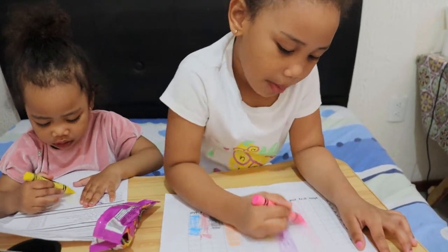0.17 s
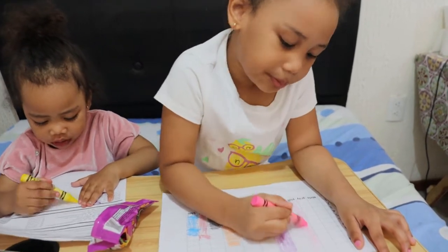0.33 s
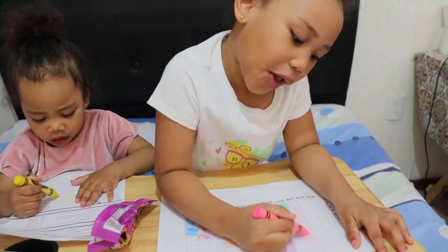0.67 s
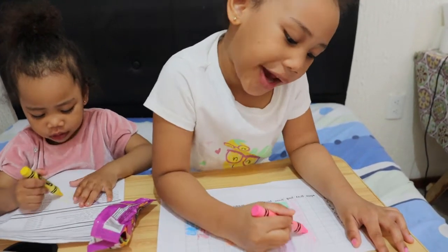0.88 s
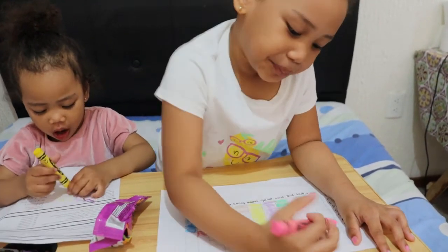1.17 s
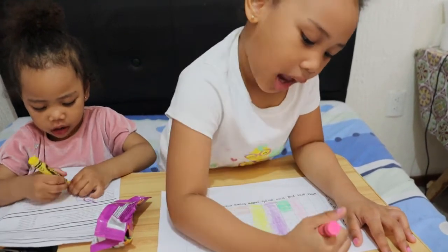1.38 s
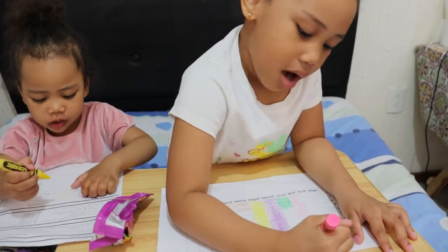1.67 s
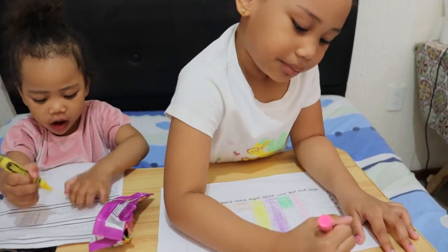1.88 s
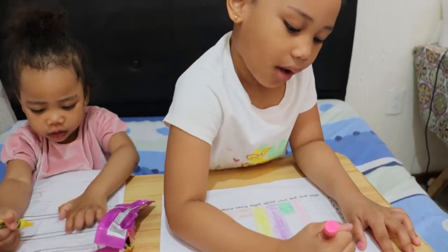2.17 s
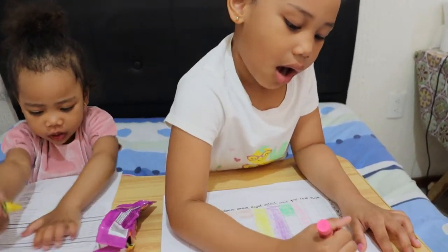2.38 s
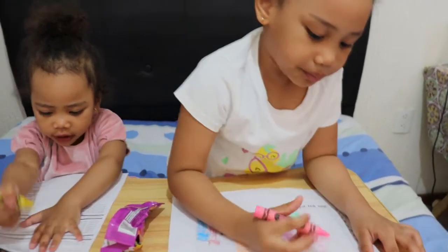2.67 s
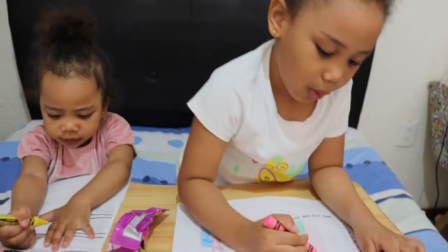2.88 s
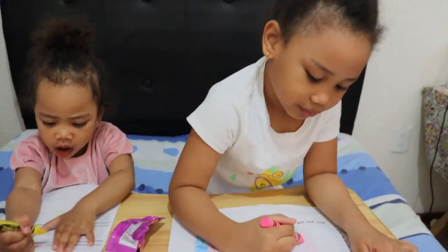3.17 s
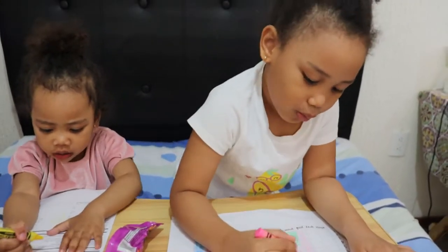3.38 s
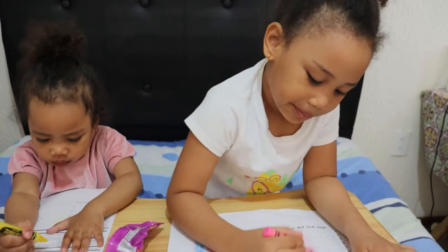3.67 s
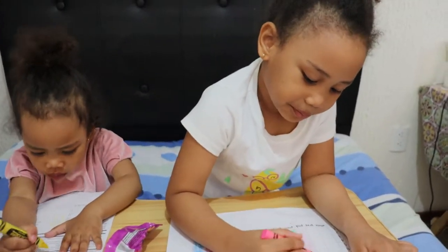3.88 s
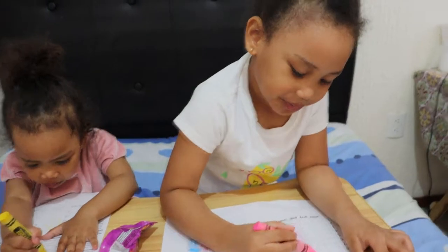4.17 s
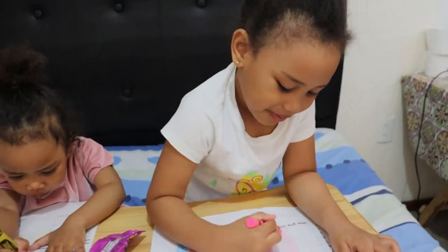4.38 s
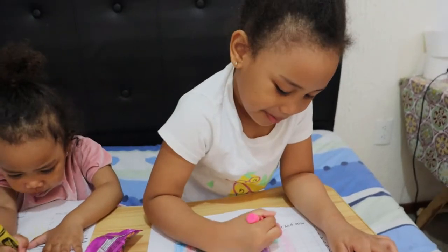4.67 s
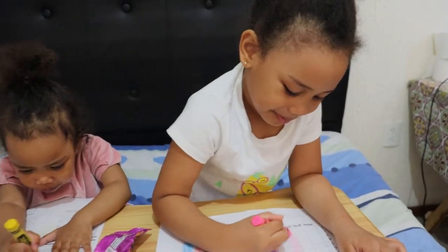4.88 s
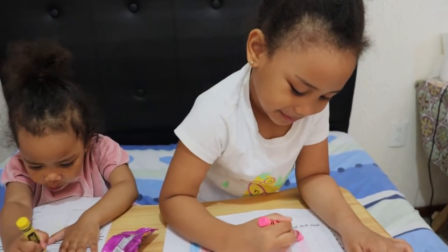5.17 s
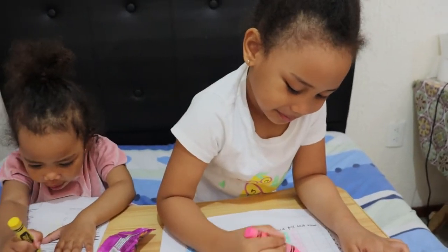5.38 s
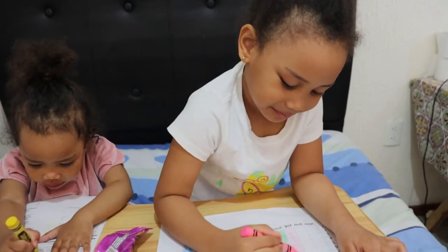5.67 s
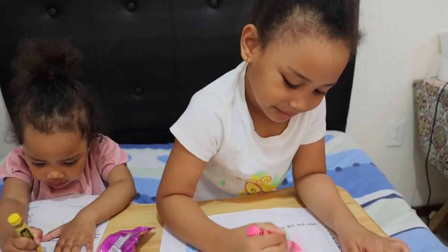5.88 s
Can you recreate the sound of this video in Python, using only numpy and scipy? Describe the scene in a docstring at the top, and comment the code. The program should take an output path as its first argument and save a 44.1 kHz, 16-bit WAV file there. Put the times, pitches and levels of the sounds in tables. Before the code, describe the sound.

Wax crayons scribble on paper over a wooden table, heard up close in a quiet bedroom with faint room tone and little echo. For the first second, quick back-and-forth strokes scratch and hiss, with a few sharp paper snaps around 0.6 seconds. From about 1 to 3 seconds the scribbling stops: hands slide the sheets in short rustling swells, the paper crackles, and soft elbow bumps and light taps sound on the table, mostly a little to the left. Crisp snaps stand out near 2.2 and 2.5 seconds. Around 2.8 seconds comes the loudest moment, a quick cluster of knocks from crayons and knuckles on the wood. From about 3.1 seconds the grainy rubbing resumes, roughly seven strokes a second, slightly right of centre. It continues to the end at 6 seconds, growing a little softer, with single knocks near 4, 4.4 and 5.2 seconds.

```python
"""Crayons on a wooden table

Two wax crayons scribble on paper in a quiet bedroom, heard up close. The wax grinds on the paper
grain, chatters and hisses, and drives the table top. Hands slide sheets about, the paper crackles
and snaps, crayons and knuckles knock on the wood, and elbows bump it softly."""
import sys
import numpy as np
from scipy import signal
from scipy.fft import rfft, irfft, next_fast_len
from scipy.io import wavfile
from scipy.ndimage import uniform_filter1d

SR = 44100
rng = np.random.default_rng(int(sys.argv[2]) if len(sys.argv) > 2 else 0)


def put_to_file(sound):
    """Save the sound as 16-bit audio at rate SR, in the file named by the first command-line argument."""
    columns = np.atleast_2d(sound).T  # one column per channel
    safe = np.clip(columns, -1, 1)
    whole_steps = np.round(safe * 32767)
    wavfile.write(sys.argv[1], SR, whole_steps.astype(np.int16))


N = 266143

# EQ curves for room tone, paper rustle, hand drag and wax hiss.
# Each row: frequency in Hz, relative level in dB.
ROOM_TONE_EQ = [(15, -49), (25, -0.5), (164, 2.5), (445, 4), (631, -3.5), (804, 0.5), (1660, -5.5),
                (3340, -6), (6210, -12.5), (8350, -14.5), (15500, -21.5)]
RUSTLE_EQ = [(1470, -2), (2500, -17), (2660, -42), (3550, 12.5), (8530, 15.5), (15200, 6.5), (16000, -34)]
DRAG_EQ = [(500, -1), (900, -5), (1600, 3.5), (2100, -0.5), (2900, 3.5), (3900, -4.5), (5000, -3.5),
           (7000, -18)]
WAX_HISS_EQ = [(3000, -3), (4500, -1.5), (6000, -4), (8300, -3), (12000, -7.5), (15800, -7)]
# The bedroom's decay. Each row: frequency in Hz, time to fall 60 dB in seconds.
ROOM_DECAY = [(200, 0.17), (1000, 0.19), (4000, 0.12), (12000, 0.12)]
# Stereo image of the diffuse sound. Each row: frequency in Hz, left-right likeness from 0 to 1.
STEREO_LIKENESS = [(60, 0.75), (240, 0.97), (950, 0.7), (3770, 0.014), (15000, 0.3)]
# Arms landing on the table. Each row: start in seconds, level in dB, pitch in Hz.
ELBOW_BUMPS = [(1.073, -44, 140), (1.262, -50.5, 110), (1.679, -48.5, 147), (1.889, -42, 346),
               (2.617, -41.5, 260), (2.781, -29, 288), (2.817, -39, 170), (4.718, -44, 283)]
# The table top's ring. Each row: frequency in Hz, relative level in dB, time to fall 60 dB in seconds.
TABLE_MODES = [(325, -1, .04), (415, 2, .045), (550, -1, .04), (720, -1, .04), (880, -1, .04),
               (1050, -3, .035), (1230, -4, .035), (1500, -2, .025), (1660, -2, .025), (2280, -4, .025),
               (2700, -4, .025), (3270, -7, .02)]
# Knocks on the wood. Each row: start in seconds, level of the deep ring and of the hard ring in dB.
WOOD_KNOCKS = [(1.012, -38, -56), (1.051, -38, -59), (1.098, -32, -45), (1.563, -27.5, -61),
               (1.623, -31.5, -59), (1.895, -46, -41), (1.967, -26.5, -38), (2.623, -51, -19),
               (2.631, -35, -20), (2.711, -38, -25), (2.773, -39, -35), (2.783, -19, -16),
               (2.799, -19, -12), (2.82, -18, -11.5), (2.874, -36, -39), (2.951, -27.5, -31),
               (3.034, -23, -20.5), (3.215, -41, -31), (3.224, -40, -19), (4.024, -21, -27),
               (4.036, -26, -34), (4.143, -23.5, -53), (4.404, -25, -30), (4.58, -30.5, -32),
               (4.676, -25.5, -30), (5.126, -61, -36), (5.221, -21, -22.5), (5.322, -30.5, -41),
               (5.502, -36.5, -33)]
# Hands and sheets sliding. Each row: start and length in seconds, share of the length at which
# speed peaks, rustle level in dB, drag in dB above the rustle.
SHEET_SLIDES = [(0.623, 0.7, 0.61, -50.5, 0), (1.247, 0.14, 0.2, -52, -1.5),
                (1.341, 0.16, 0.27, -57.5, 7.5), (1.448, 0.35, 0.54, -53.5, 0),
                (1.914, 0.15, 0.42, -48, -0.5), (2.155, 0.13, 0.28, -47.5, 6), (2.221, 0.45, 0.5, -43, 1),
                (2.594, 0.27, 0.1, -48, 9), (2.763, 0.29, 0.042, -50.5, 15), (3.003, 0.32, 0.84, -51.5, 6),
                (5.22, 0.2, 0.029, -65, 19.5)]
# Paper snaps, crayon taps and the sharp first contact of knocks on wood.
# Each row: start in seconds, body level in dB, body pitch in Hz, crack in dB above the body.
SNAPS_AND_TAPS = [(0.616, -20, 5900, -19), (0.655, -14, 5300, 7), (0.659, -18.5, 9100, 5),
                  (0.6769, -17, 5200, -7), (0.9502, -35.5, 3100, -10), (0.96, -33.5, 3130, -12),
                  (1.054, -35, 870, -16), (1.178, -34.5, 1420, -11), (1.199, -34, 3030, -16),
                  (1.2097, -32.5, 2920, -9), (1.32, -37.5, 2890, -7), (1.365, -25.5, 3370, 1),
                  (1.738, -45, 8500, 7), (1.7508, -40, 1500, 2), (1.903, -32, 1620, -4),
                  (1.942, -47, 1600, 6), (2.067, -38, 2820, -5), (2.182, -18.5, 4600, -2),
                  (2.192, -17.5, 2650, -19), (2.465, -15, 3370, -18), (2.6325, -27, 1380, 9),
                  (2.786, -23, 1640, 10), (2.82, -15.5, 1970, -1), (2.874, -29, 1880, -10),
                  (3.032, -25.5, 1650, 1.5), (3.2163, -17.5, 1540, -4), (4.025, -22, 886, -12),
                  (4.405, -20, 890, -5.5), (4.582, -32.5, 1980, -19), (4.7194, -28, 3150, -16),
                  (4.957, -28, 3420, -16), (5.221, -24, 1910, -4.5), (5.266, -38, 7500, -2),
                  (5.291, -32, 8650, -5), (5.316, -39, 8000, -6)]
# The scribbling. Each row: start and length in seconds, share of the length at which pressure peaks,
# pressure in dB, board tone under the tip in Hz.
CRAYON_STROKES = [(0.0, 0.062, 0.02, -34, 753), (0.06, 0.12, 0.42, -44, 840),
                  (0.202, 0.12, 0.55, -37.5, 627), (0.316, 0.082, 0.73, -40.5, 815),
                  (0.38, 0.091, 0.53, -38.5, 620), (0.45, 0.14, 0.29, -43.5, 810),
                  (0.589, 0.11, 0.31, -48.5, 890), (0.717, 0.077, 0.79, -46, 800),
                  (0.853, 0.092, 0.13, -48.5, 780), (3.085, 0.18, 0.29, -41.5, 685),
                  (3.281, 0.12, 0.48, -37.5, 810), (3.393, 0.15, 0.61, -40.5, 760),
                  (3.565, 0.12, 0.53, -38.5, 820), (3.689, 0.12, 0.64, -45, 770),
                  (3.837, 0.099, 0.55, -43, 770), (3.95, 0.14, 0.55, -46, 730),
                  (4.118, 0.1, 0.28, -41.5, 765), (4.245, 0.22, 0.45, -42.5, 794),
                  (4.489, 0.081, 0.81, -47.5, 765), (4.636, 0.11, 0.37, -48, 633),
                  (4.766, 0.088, 0.63, -48.5, 780), (4.893, 0.1, 0.41, -45.5, 640),
                  (5.013, 0.094, 0.34, -51.5, 616), (5.303, 0.15, 0.77, -46.5, 824),
                  (5.493, 0.1, 0.3, -47, 744), (5.627, 0.081, 0.81, -46, 940),
                  (5.749, 0.092, 0.35, -47.5, 674), (5.886, 0.1, 0.54, -47.5, 820)]
# Crayon and sheet resonating under friction. Each row: centre and width in Hz, relative gain in dB.
CHATTER_BANDS = [(1610, 430, -38), (2240, 480, 10), (2485, 910, 12), (3353, 760, 11.5), (3660, 170, 8),
                 (5000, 4800, -10)]

USUAL_PRESSURE_DB, CHATTER_DB, HISS_DB = -43, -47, -52  # chatter and hiss at the usual pressure
BARE_PAPER_UNTIL_S, BARE_PAPER_DB = 0.6, 6.5  # wax hisses more while it covers bare paper
RATTLE_S, BURST_S, CRACK_S = 0.013, 0.0015, 0.00095  # decay time constants
LEFT_SEAT_S = (1.45, 3.05)  # the close sounds sit left in this span, otherwise slightly right


def gain_of(db):
    """Decibels to gain."""
    return 10 ** (np.asarray(db) / 20)


def unit_rms(x):
    """Scales to rms 1."""
    return x / np.sqrt(np.mean(x ** 2) + 1e-20)


def curve_at(points, hz):
    """Reads a curve on a log-frequency axis."""
    f, value = np.transpose(points)
    return np.interp(np.log(hz + 1), np.log(f + 1), value)


def add(mix, start_s, sound):
    """Mixes a sound in at its start time."""
    part = mix[round(start_s * SR):][:len(sound)]
    part += sound[:len(part)]


def resonate(x, hz, width_hz):
    """A resonance that can glide: shifts hz down to zero, smooths, and shifts back."""
    carrier = np.exp(2j * np.pi * np.cumsum(hz * np.ones(len(x))) / SR)
    pole = np.exp(-np.pi * width_hz / SR)
    return 2 * (carrier * signal.lfilter([1 - pole], [1, -pole], x / carrier + 1e-18)).real


def equalise(x, curve):
    """Shapes x by an EQ curve, to rms 1."""
    size = next_fast_len(N)
    gain = gain_of(curve_at(curve, np.fft.rfftfreq(size, 1 / SR)))
    return unit_rms(irfft(rfft(x, size) * gain, size)[..., :N])


def grit(clump_db, clump_s, channels):
    """Friction noise: dense slips whose strength comes in clumps."""
    clumps = unit_rms(uniform_filter1d(rng.standard_normal(N), round(clump_s * SR)))
    return unit_rms(rng.standard_normal((channels, N)) * gain_of(clump_db * clumps))


def hand_speed(start, length, peak):
    """A hand speeds up from rest, peaks part of the way along, and stops again."""
    peak_s = start + np.clip(peak, .05, .95) * length
    along = np.interp(np.arange(N) / SR, [start, peak_s, start + length], [0, .5, 1])
    return abs(np.sin(np.pi * along)) + 1e-9


def room_tone():
    """A faint, dark bed of bedroom air."""
    return gain_of(-54) * equalise(rng.standard_normal((2, N)), ROOM_TONE_EQ)


def reverb(x):
    """Sparse reflections, different at each microphone, each band dying at its own speed."""
    taps = np.zeros((2, SR // 2))
    arrivals = np.arange(40, SR // 2 - 20, 20) + rng.integers(0, 20, (2, (SR // 2 - 41) // 20))
    np.put_along_axis(taps, arrivals, rng.choice([-1., 1.], arrivals.shape), 1)
    hz, t, bands = signal.stft(taps, SR, nperseg=256)
    decay = gain_of(-60 * t / curve_at(ROOM_DECAY, hz)[:, None])
    tail = signal.istft(bands * decay, SR, nperseg=256)[1]
    return signal.fftconvolve(x[None], tail / np.linalg.norm(tail[0]), axes=1)[:, :N]


def close_pair(stereo):
    """Long waves reach two close microphones alike, so the image narrows in the bass."""
    size = next_fast_len(N)
    likeness = curve_at(STEREO_LIKENESS, np.fft.rfftfreq(size, 1 / SR))
    left, right = rfft(stereo, size)
    mid = (left + right) * np.sqrt(1 + likeness) / 2
    side = (left - right) * np.sqrt(1 - likeness) / 2
    return irfft(np.array([mid + side, mid - side]), size)[:, :N]


def elbow_bumps():
    """Soft blows on the table: a rounded attack and a few uneven low cycles."""
    out, t = np.zeros(N), np.arange(6000) / SR
    envelope = t / 0.005 * np.exp(1 - t / 0.0063)
    for start, db, hz in ELBOW_BUMPS:
        noise = rng.standard_normal(len(t))
        thump = unit_rms(resonate(resonate(noise, hz, 0.73 * hz), hz, 0.73 * hz))
        add(out, start, gain_of(db) * thump * envelope)
    return out


def slide_envelopes():
    """Rustle and drag swell with the speed of each slide."""
    rustle, drag = np.zeros((2, N))
    for start, length, peak, rustle_db, drag_db in SHEET_SLIDES:
        swell = gain_of(rustle_db) * hand_speed(start, length, peak) ** 1.55
        rustle += swell
        drag += gain_of(drag_db) * swell
    return rustle, drag


def sliding_sheets(rustle, drag):
    """Skin and paper rub over a wide area: a smooth bright rustle and a duller drag."""
    bright = equalise(grit(clump_db=1.1, clump_s=.004, channels=2), RUSTLE_EQ)
    dull = equalise(grit(clump_db=1.6, clump_s=.012, channels=2), DRAG_EQ)
    return rustle * bright + drag * dull


def paper_crackles(rustle, per_second=60):
    """Tiny creases let go at random while the sheets move; most are faint."""
    pops = gain_of(4 * np.minimum(rng.exponential(1, N), 3)) * (rng.random(N) < per_second / SR)
    band = rng.integers(0, 8, N)
    ticks = sum(resonate(resonate(pops * (band == k), hz, 0.86 * hz), hz, 0.92 * hz)
                for k, hz in enumerate(np.geomspace(900, 6000, num=8)))
    return rustle * gain_of(-10) * unit_rms(ticks)


def snaps_and_taps():
    """Paper snaps, crayon taps and knock attacks: each a short pitched burst with a bright crack."""
    out, t = np.zeros(N), np.arange(1500) / SR
    treble = signal.butter(4, 4300, "highpass", fs=SR, output="sos")
    for start, db, hz, crack_db in SNAPS_AND_TAPS:
        kick = rng.standard_normal(len(t)) + 3 * (t == 0)
        body = resonate(resonate(kick * np.exp(-t / BURST_S), hz, .35 * hz), hz, .5 * hz)
        crack = signal.sosfilt(treble, resonate(kick * np.exp(-t / CRACK_S), 5200, 6000))
        burst = body / abs(body).max() + gain_of(crack_db) * crack / abs(crack).max()
        add(out, start, gain_of(db) * burst)
    return out


def wood_knocks(split_hz=1150):
    """A first contact and a short rattle ring the deep and the hard modes of the table top."""
    out, t = np.zeros(N), np.arange(5000) / SR
    hz, db, t60 = np.transpose(TABLE_MODES)[:, :, None]
    deep = hz[:, 0] < split_hz
    for start, deep_db, hard_db in WOOD_KNOCKS:
        contacts = (t == 0) + 0.04 * rng.uniform(-1, 1, len(t)) ** 3 * np.exp(-t / RATTLE_S)
        # the spot struck rebalances the modes and the hand's load detunes them
        spot, load = rng.uniform(-1, 1, (2, len(hz), 1))
        tuned_hz = hz * (1 + .05 * load)
        modes = gain_of(db + 3.3 * spot - 60 * t / t60) * np.sin(2 * np.pi * tuned_hz * t)
        for level_db, group in (deep_db, deep), (hard_db, ~deep):
            ring = signal.fftconvolve(contacts, modes[group].sum(0))
            add(out, start, gain_of(level_db) * ring / abs(ring).max())
    # a small board radiates little below its first mode
    return signal.sosfilt(signal.butter(3, 260, "highpass", fs=SR, output="sos"), out)


def stroke_envelopes():
    """The tip speeds up and stops at each turn; each layer follows the speed by its own power."""
    pressure, chatter, hiss = np.zeros((3, N))
    for start, length, peak, pressure_db, _ in CRAYON_STROKES:
        speed = hand_speed(start, length, peak)
        extra_db = pressure_db - USUAL_PRESSURE_DB
        pressure += gain_of(pressure_db) * speed ** 2
        chatter += gain_of(CHATTER_DB + 0.99 * extra_db) * speed ** 1.5
        # the hiss follows the plain sweep of the tip, wherever the pressure peaks
        sweep = hand_speed(start + 0.006, length, peak=0.57)
        bare_db = BARE_PAPER_DB * (start < BARE_PAPER_UNTIL_S)
        hiss += gain_of(HISS_DB + 0.11 * extra_db + bare_db) * sweep ** 0.81
    return pressure, chatter, hiss


def crayons():
    """Slips of wax ring the board and the crayon itself: a mono rub and a wide stereo hiss."""
    pressure, chatter, hiss = stroke_envelopes()
    slips = grit(clump_db=2.5, clump_s=.006, channels=1 + len(CHATTER_BANDS))
    jitter = rng.standard_normal((2 * len(CHATTER_BANDS), N))
    grip = unit_rms(uniform_filter1d(uniform_filter1d(jitter, 2500), 2500))
    start, length, peak, _, stroke_hz = np.transpose(CRAYON_STROKES)
    tone_hz = np.interp(np.arange(N) / SR, start + peak * length, stroke_hz)
    tone_hz *= 1 + .08 * np.roll(grip[0], SR)  # the tone drifts as the tip travels
    tone = unit_rms(resonate(resonate(resonate(slips[0], tone_hz, 500), tone_hz, 620), tone_hz, 690))
    board = unit_rms(sum(gain_of(db) * resonate(slips[0], hz, 17 / t60)
                         for hz, db, t60 in TABLE_MODES[:6]))
    drum = unit_rms(resonate(resonate(slips[0], 367, 120), 600, 180))  # the whole top under the hand
    drum_db = -10 + 5.7 * np.roll(grip[1], SR)
    wood = gain_of(2.5) * tone + gain_of(-26) * board + gain_of(drum_db) * drum
    stick = np.zeros(N)
    for k, (hz, width, db) in enumerate(CHATTER_BANDS):  # the grip bends each band's pitch and level
        held_hz = hz * (1 + 0.054 * grip[2 * k])
        ring = resonate(resonate(slips[k + 1], held_hz, width), held_hz, 2 * width)
        stick += gain_of(db + 3 * grip[2 * k + 1]) * ring
    grain = equalise(grit(clump_db=.8, clump_s=.004, channels=2), WAX_HISS_EQ)
    return pressure * wood + chatter * unit_rms(stick), hiss * grain


def scene():
    """Close rubs, hits and ticks in front of wide paper noise, reverb and room tone."""
    rub, hiss = crayons()
    rustle, drag = slide_envelopes()
    hits = wood_knocks() + elbow_bumps()
    ticks = snaps_and_taps() + paper_crackles(rustle)
    near = rub + hits + ticks
    wide = hiss + sliding_sheets(rustle, drag)
    t = np.arange(N) / SR
    left_seat = near * ((t > LEFT_SEAT_S[0]) & (t < LEFT_SEAT_S[1]))
    right_seat = near - left_seat
    # each seat reaches the far microphone a few samples late
    left = left_seat + np.roll(right_seat, 2)
    right = gain_of(1) * (right_seat + np.roll(left_seat, 6))
    air = room_tone()
    reverb_send = rub + 1.28 * hits + 0.87 * ticks + 0.18 * wide[0]
    return np.array([left, right]) + close_pair(gain_of(-2) * reverb(reverb_send) + wide + air)


def record(dry, low_cut_hz=70, high_cut_hz=15850):
    """The microphones lose the deep bass, and a steep filter trims the very top."""
    thin = signal.sosfilt(signal.butter(3, low_cut_hz, "highpass", fs=SR, output="sos"), dry)
    lowpass = signal.firwin(511, high_cut_hz, window=("kaiser", 9), fs=SR)
    return signal.oaconvolve(thin, lowpass[None], "same")


dry = scene()
out = record(dry)
put_to_file(out)
```